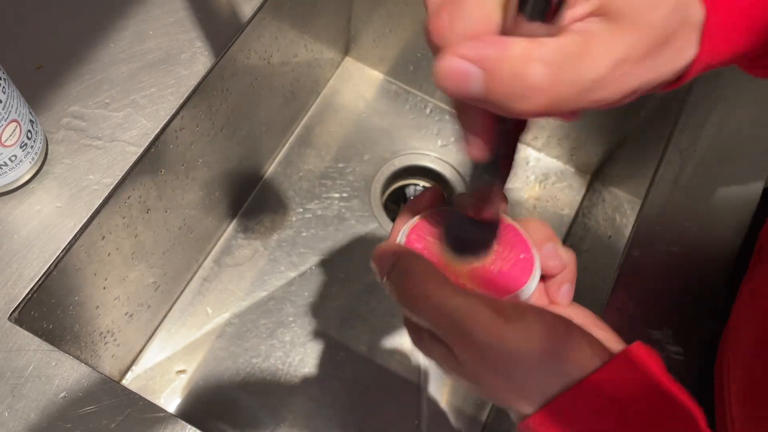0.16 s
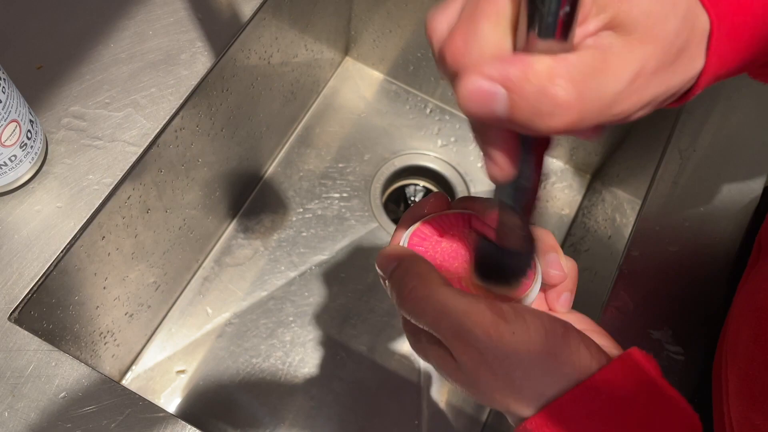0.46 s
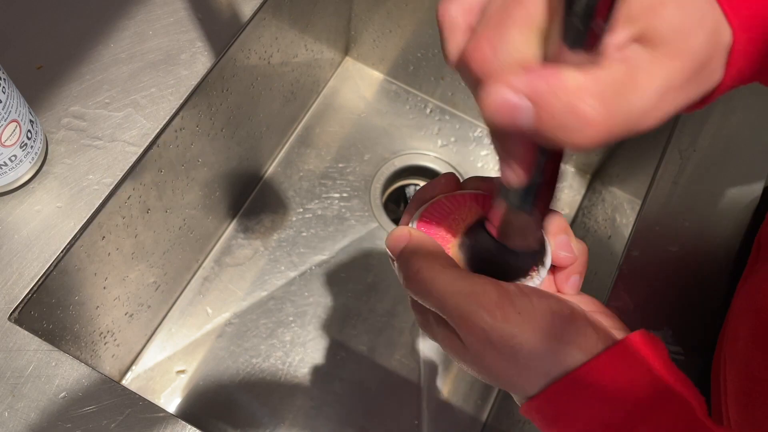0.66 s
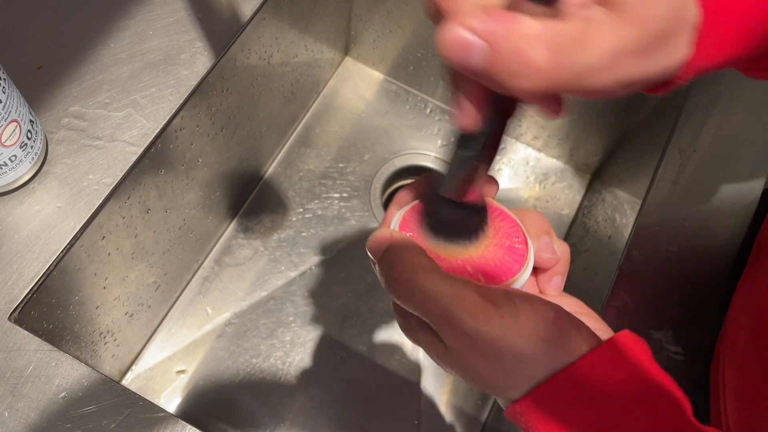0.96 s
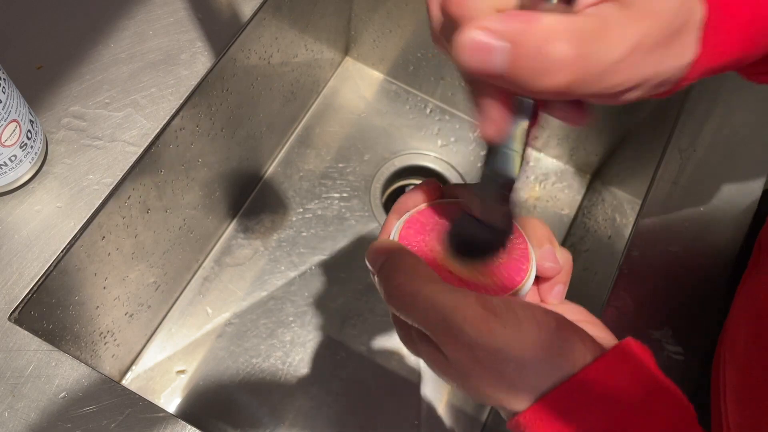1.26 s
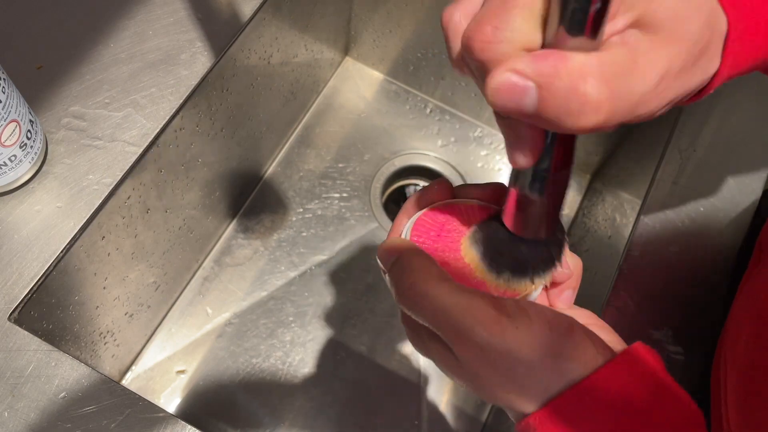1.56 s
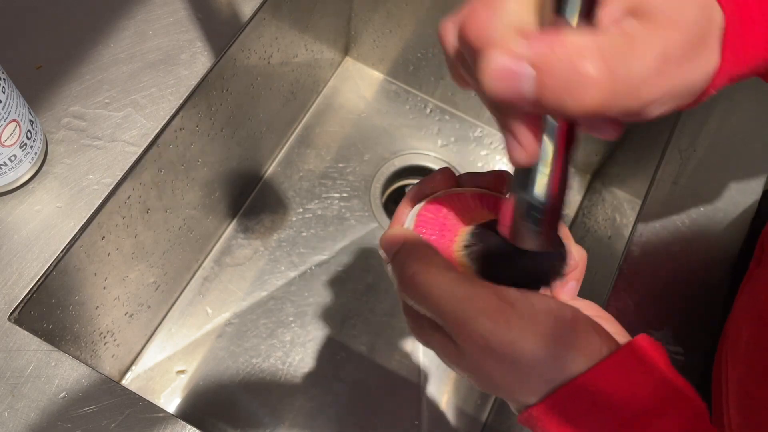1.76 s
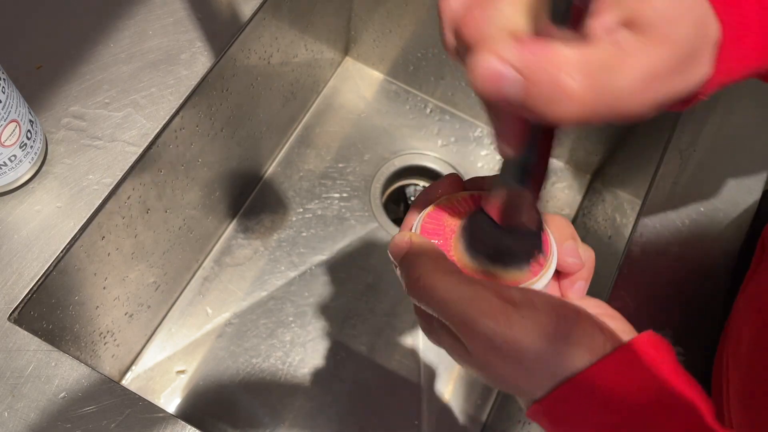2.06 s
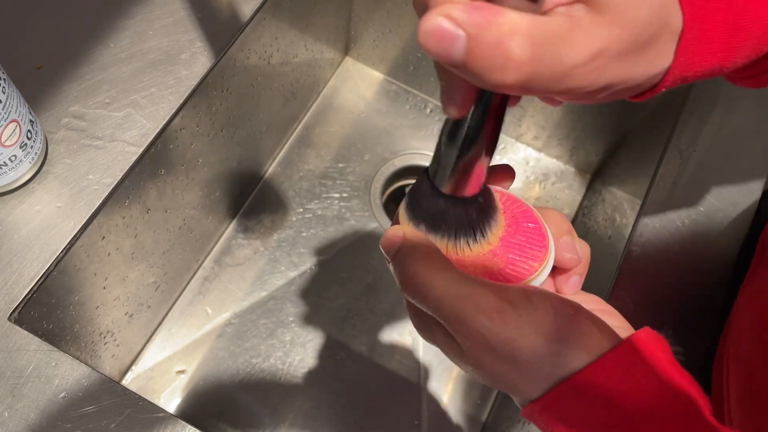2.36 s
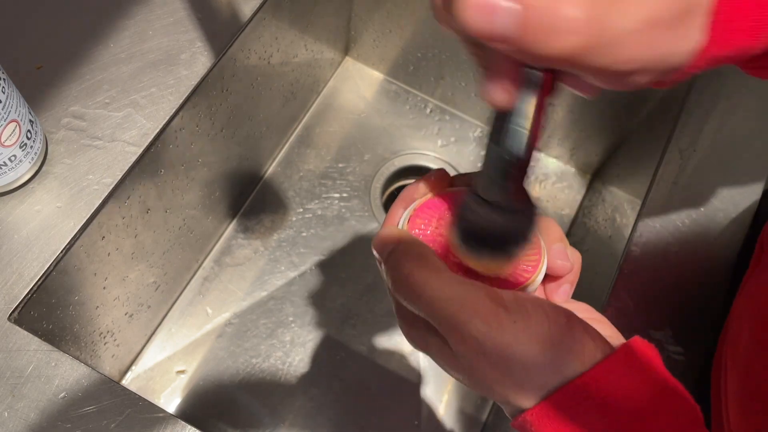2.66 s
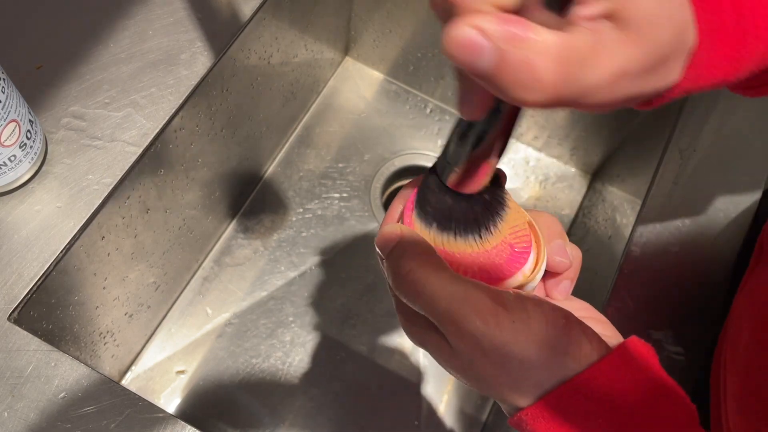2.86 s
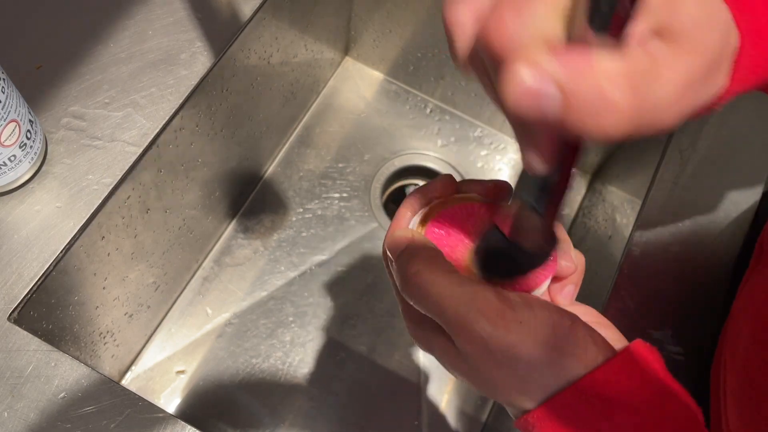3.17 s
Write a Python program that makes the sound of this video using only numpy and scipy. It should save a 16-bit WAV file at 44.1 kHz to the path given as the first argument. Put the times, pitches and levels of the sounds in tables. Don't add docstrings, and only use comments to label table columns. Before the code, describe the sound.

Quick raspy bristle strokes on a wet ridged pad, snapping and smacking, ending with hard clacks

```python
import sys
import numpy as np
from scipy import signal
from scipy.fft import rfft, irfft
from scipy.io import wavfile
from scipy.ndimage import uniform_filter1d

SR = 44100
rng = np.random.default_rng(int(sys.argv[2]) if len(sys.argv) > 2 else 0)


def inscribe(sig):
    pcm = np.round(np.clip(np.atleast_2d(sig).T, -1, 1) * 32767)
    wavfile.write(sys.argv[1], SR, pcm.astype(np.int16))


def linear_from_db(decibels):
    return 10 ** (np.asarray(decibels, float) / 20)


N = 145530

# [t/s, hold/s, speed level/dB, body level/dB]
STROKES = [(-.02, 0.027, -49.5, 1.5), (0.069, 0.035, -52, 5), (0.18, 0.029, -48, -5),
           (0.212, 0.045, -61, 10), (0.278, 0.031, -47, -6.5), (0.398, 0.027, -47, -1.5),
           (0.491, 0.036, -48, -0.5), (0.6, 0.014, -43, -3.5), (0.7, 0.038, -49.5, -0.5),
           (0.809, 0.04, -48, -2), (0.905, 0.032, -53, -3), (0.934, 0.018, -45, 4),
           (1.026, 0.045, -50.5, 2.5), (1.119, 0.058, -54.5, 2), (1.23, 0.038, -49.5, -1.5),
           (1.291, 0.0082, -54, 11.5), (1.356, 0.039, -48, 2), (1.474, 0.063, -52.5, 2.5),
           (1.584, 0.044, -52, -1), (1.69, 0.067, -52.5, 3.5), (1.808, 0.067, -51.5, 5.5),
           (1.94, 0.015, -43.5, -1), (2.052, 0.04, -50, 2.5), (2.156, 0.04, -48.5, 2),
           (2.277, 0.055, -50.5, 0), (2.384, 0.039, -51, 3.5),
           (2.442, 0.018, -53.5, 6.5),
    (2.485, 0.077, -51.5, 6.5),
    (2.595, 0.037, -54, 5.5),
    (2.734, 0.018, -50.5, 2.5),
    (2.78, 0.038, -49, -0.5),
    (2.875, 0.065, -54.5, 5),
    (2.996, 0.042, -54.5, 2.5),
    (3.117, 0.035, -47.5, 2.5),
    (3.218, 0.05, -51.5, 10),
    (3.266, 0.049, -61.5, 14.5),
]
# [f/Hz, level/dB]
BRISTLE_COLOUR = [(580, -24), (900, -14.5), (2400, -6), (3600, 2), (5200, -3), (8000, 2), (13500, -12.5),
                  (15500, -6.5)]
# [f/Hz, width/Hz, level/dB]
PAD_MODES = [(846, 470, 0.5), (1550, 350, 22), (2200, 150, -36.5), (3560, 85, -27), (5400, 800, 10)]
# [t/s, peak level/dB, ring f/Hz]
SNAPS = [(0.036, -38, 2000), (.071, -40, 1510), (.246, -33, 2900), (.174, -51, 3390), (.18, -27, 5140),
         (.287, -31.5, 2120), (0.396, -49, 5000), (0.404, -47, 3300), (.412, -49, 3000), (0.487, -34, 4800),
         (0.496, -38, 3420), (0.561, -45, 1500), (0.592, -41, 5460), (0.605, -41, 4950), (.62, -24, 4500),
         (0.677, -57, 5360), (.692, -44, 3820), (.7105, -29, 3060), (0.802, -34, 5150), (0.907, -51, 5200),
         (.914, -45, 3550), (.948, -34, 1570), (1.007, -30, 4150), (1.033, -43, 4990), (1.074, -42, 3500),
         (1.18, -44, 3000), (1.242, -41, 840), (1.3, -49, 1500), (1.343, -32, 3340), (1.463, -48, 5100),
         (1.48, -29.5, 4100), (1.529, -54, 5180), (1.549, -58, 764), (1.593, -36, 5040), (1.611, -55, 775),
         (1.713, -42, 1160), (1.744, -39.5, 1600), (1.756, -39, 1700), (1.776, -37, 1610),
         (1.817, -44, 4180), (1.878, -48, 740), (1.926, -31, 5160), (1.95, -35.5, 1240), (2.056, -46, 1620),
         (2.149, -36, 5310), (2.166, -38, 3520), (2.44, -52, 3610), (2.783, -49, 2480), (2.607, -32, 1240),
         (2.62, -46, 4500), (1.925, -44, 3000), (2.881, -34, 1810), (2.89, -38, 1700), (3.202, -39, 2400),
         (3.228, -22, 1550), (3.234, -22, 2290)]
# [t/s, peak level/dB, ring f/Hz, ring t60/s, tick level/dB]
SMACKS = [(0.038, -27.5, 1170, 0.0026, -44), (.202, -32.5, 5370, .004, 0), (.245, -30.5, 2190, 0.009, -18),
          (.33, -35.5, 4530, 0.0034, -1), (0.482, -34.5, 5200, 0.0091, -6),
          (0.521, -44.5, 1190, 0.021, -15), (0.601, -45, 1600, 0.02, 1), (.879, -23, 2540, 0.0013, -25),
          (.938, -32, 3240, 0.011, -15.5), (1.099, -41.5, 1020, 0.0087, -7), (1.241, -34, 3170, 0.011, -7),
          (1.373, -39.5, 1590, 0.072, 7.5), (1.944, -25.5, 5180, 0.0084, -2), (2.174, -29, 5100, 0.013, -5),
          (2.386, -37, 3060, 0.01, -16), (2.5073, -31, 1358, 0.031, -25), (2.5364, -27.5, 1870, 0.012, -29),
          (2.538, -35, 3190, 0.02, -20), (2.525, -39, 1920, 0.024, -32), (2.605, -36, 1500, 0.0073, -5),
          (2.695, -36.5, 1140, 0.027, -50), (2.785, -40.5, 510, 0.034, -20),
          (3.084, -35.5, 3060, 0.0033, -9)]
# [t/s, peak level/dB, ring f/Hz, tick level/dB, thump level/dB]
KNOCKS = [(1.957, -38.5, 1120, -40, -8.5), (2.191, -38, 970, -20, -14.5), (2.609, -30.5, 2200, -3, -19),
          (2.774, -22.5, 1760, -3.5, -33.5), (2.7846, -24, 2460, 4.5, -42), (2.887, -25, 1600, -25, -12),
          (2.888, -24, 1860, -13, -20.5), (2.894, -32.5, 2920, -26, -13.5), (3.04, -42.5, 1090, -15, -10),
          (3.096, -37, 1550, -11, -37), (3.101, -30.5, 1840, -31, -23.5), (3.207, -23.5, 2220, -31, -32),
          (3.2128, -21.5, 3090, -11, -19), (3.2167, -16, 1526, 1, -24.5)]
# [f/Hz, level/dB, t60/s]
CUP_MODES = [(1245, -19, 0.014), (1573, -15, 0.064), (1700, -12.5, 0.032), (2067, -18.5, 0.077),
             (2382, -16, 0.087), (3324, 2, 0.0077)]
# [f/Hz, phase/rad]
LEAD = [(300, 0), (600, -1.0), (2500, 1.0), (3200, .1), (4300, 1.0), (4950, -.5), (6500, 0)]
# [f/Hz, level/dB]
SHADE = [(1900, 0), (2700, 1.5), (3300, -2), (4500, -7), (5200, 0)]
# [f/Hz, likeness/0..1]
SAME = [(400, .99), (600, .88), (900, .96), (1800, .995), (2600, .82), (3500, .93), (4500, .72),
        (5500, .96), (7000, .96)]
# [t/s, level/dB]
DRONE_LEVEL = [(0.0, -45), (0.3, -49.5), (0.6, -47), (0.92, -48), (1.2, -56), (1.6, -52.5), (2.05, -51),
               (2.15, -44), (2.25, -49), (2.8, -47.5), (3.3, -47)]
# [f/Hz, width/Hz, level/dB]
DRONE_BANDS = [(30.7, 5.3, -17), (67, 14.5, -5.5), (111.7, 15, -11.5), (270, 36, -26)]
# [f/Hz, level/dB]
AIR_COLOUR = [(130, -17.5), (330, -29.5), (420, -32), (600, -41.5), (800, -29), (1100, -39), (2700, -47),
              (6000, -43)]
# [f/Hz, likeness/0..1]
AIR_SAME = [(100, .99), (600, .3), (1500, .9), (3500, .3)]

RISE_S, FALL_S, FALL_DB = 0.018, 0.018, -15
CREST_DB, CREST_AT = -3, 0.53
TAIL_DB, TAIL_DB_PER_S, REST_DB = -14.5, 140, -73
FLICKS_PER_S, FLICK_SPREAD_DB = 9000, 1.5
RIDGES_PER_S, RIDGE_DB = 530, 2.5
SMEAR = 0.79
BRISTLE_EDGE_HZ, PAD_DB, PATCHY_DB = 15950, -9.5, 2.1
SWELL_S, ROUGH = .0005, .35
TICK_S, TICK_HZ, TICK_GRIT, GRIT_FROM_HZ = .00045, 5200, .9, 1800
SNAP_CYCLES, SNAP_TICK_DB = 9, -8
GLIDE = 0.019
KNOCK_T60_S, CUP_DETUNE = .012, .04
THUMP_HZ, THUMP_T60_S, THUMP_ROUGH_DB = 272, 0.06, -3
THUMP_DROP, THUMP_DROP_S = 2, .002
SLIP_FROM_HZ, HALF_TURN_HZ, DWELL = 4450, 3300, .36
SINK_T60_S, SINK_EDGE_HZ = .035, 9000
HUM_HZ, HUM_DB = 58.2, -3
AIR_DB, AIR_PATCHY_DB, AIR_EDGE_HZ = -61, 2, 7000
EDGE_HZ = 15950
BLOCK_START = 709
JOINT_DB, JOINT_WOBBLE_DB, JOINT_LOUD_DB = 10, 7, 11


def brush():
    speed, body = stroke_power()
    drive = bristle_drive()
    hiss = evened(shaped(drive, lambda hz: linear_from_db(read(BRISTLE_COLOUR, hz)) * (hz < BRISTLE_EDGE_HZ)))
    pad = np.zeros(N)
    for k, (hz, width, db) in enumerate(PAD_MODES):
        mode = resonate(resonate(drive, hz, 2 * width), hz, 2 * width)
        pad += (-1) ** k * linear_from_db(db) * mode
    return patchy(np.sqrt(speed) * hiss + linear_from_db(PAD_DB) * np.sqrt(body) * evened(pad), PATCHY_DB)


def stroke_power():
    t = np.arange(N) / SR
    speed = np.full(N, linear_from_db(REST_DB) ** 2)
    body = speed.copy()
    for start, hold, db, body_db in STROKES:
        end = start + hold
        edge = np.maximum((start - t) / RISE_S, 0) + np.maximum((t - end) / FALL_S, 0)
        off_crest = np.abs(np.clip((t - start) / hold, 0, 1) - CREST_AT)
        arch = linear_from_db(db + FALL_DB * edge + CREST_DB * off_crest)
        tail = (t > start) * linear_from_db(db + TAIL_DB - TAIL_DB_PER_S * np.abs(t - end))
        power = arch ** 2 + tail ** 2
        speed += power
        body += power * linear_from_db(body_db) ** 2
    return speed, body


def bristle_drive():
    ridges = linear_from_db(RIDGE_DB * evened(resonate(rng.standard_normal(N), RIDGES_PER_S / 2, RIDGES_PER_S)))
    strength = linear_from_db(FLICK_SPREAD_DB * np.minimum(rng.exponential(1, N), 5))
    flicks = (rng.random(N) < FLICKS_PER_S / SR) * strength * rng.choice([-1., 1.], N)
    return evened(ridges * (evened(flicks) + SMEAR * rng.standard_normal(N)))


def patchy(x, depth_db):
    z = signal.stft(x, nperseg=256, noverlap=192)[2]
    field = uniform_filter1d(rng.standard_normal(z.shape), size=4, axis=0)
    field = evened(uniform_filter1d(field, size=10, axis=1))
    return signal.istft(z * linear_from_db(depth_db * field), nperseg=256, noverlap=192)[1][:N]


def snaps():
    t, out = np.arange(2000) / SR, np.zeros(N)
    for s, db, hz in SNAPS:
        t60 = SNAP_CYCLES / hz
        tick_gain = linear_from_db(SNAP_TICK_DB) * np.clip(hz / TICK_HZ, 0, 1) ** 2
        snap = ring(t, hz, t60) + ROUGH * scuff(t, hz, t60) + tick_gain * tick(t)
        add(out, s, linear_from_db(db) * snap)
    return out


def smacks():
    t, out = np.arange(2000) / SR, np.zeros(N)
    for s, db, hz, t60, tick_db in SMACKS:
        film = ring(t, hz * (1 + GLIDE * t / t60), t60)
        film = film + .5 * ring(t, 1.48 * hz, t60 / 2) + ROUGH * scuff(t, hz, t60)
        add(out, s, linear_from_db(db) * (film + linear_from_db(tick_db) * tick(t)))
    return out


def knocks():
    t, out = np.arange(5000) / SR, np.zeros(N)
    sag = t + THUMP_DROP * THUMP_DROP_S * (1 - np.exp(-t / THUMP_DROP_S))
    for s, db, hz, tick_db, thump_db in KNOCKS:
        knock = ring(t, hz, KNOCK_T60_S) + ROUGH * scuff(t, hz, KNOCK_T60_S)
        grip = 1 + CUP_DETUNE * rng.uniform(-0.75, 1, len(CUP_MODES))
        for (mode_hz, mode_db, t60), bend in zip(CUP_MODES, grip):
            far_db = 7.9 * abs(np.log2(mode_hz / hz))
            knock += linear_from_db(mode_db - far_db) * ring(t, mode_hz * bend, t60)
        thud = np.sin(2 * np.pi * THUMP_HZ * sag) * linear_from_db(-60 * t / THUMP_T60_S)
        thud = thud + linear_from_db(THUMP_ROUGH_DB) * scuff(t, 2 * THUMP_HZ, THUMP_T60_S)
        add(out, s, linear_from_db(db) * (knock + linear_from_db(tick_db) * tick(t) + linear_from_db(thump_db) * thud))
    return out


def ring(t, hz, t60):
    return np.sin(2 * np.pi * hz * t) * linear_from_db(-60 * t / t60) * (1 - np.exp(-t / SWELL_S))


def scuff(t, hz, t60):
    band = resonate(resonate(rng.standard_normal(len(t)), hz, hz / 2), hz, hz)
    return evened(band) * linear_from_db(-60 * t / t60) * (1 - np.exp(-t / SWELL_S))


def tick(t):
    grit = uniform_filter1d(rng.standard_normal(len(t)), size=3)
    crack = (np.cos(2 * np.pi * TICK_HZ * t) + TICK_GRIT * grit) * np.exp(-t / TICK_S)
    return signal.lfilter(*signal.butter(1, GRIT_FROM_HZ, "high", fs=SR), crack)


def ports(x):
    side = np.array([[1], [-1]])

    def lead(hz):
        slip = np.pi * np.maximum(hz - SLIP_FROM_HZ, 0) / HALF_TURN_HZ
        return read(LEAD, hz) + slip - DWELL * np.sin(2 * slip)

    def direct_gain(hz):
        shade = linear_from_db(side * read(SHADE, hz) / 2)
        return np.sqrt(read(SAME, hz)) * shade * np.exp(.5j * side * lead(hz))

    return shaped(x, direct_gain) + shaped(sink(x), lambda hz: np.sqrt(1 - read(SAME, hz)))


def sink(x):
    taps = np.zeros((2, 8000))
    at = np.arange(60, 7980, 20) + rng.integers(0, 20, (2, 396))
    np.put_along_axis(taps, at, rng.choice([-1., 1.], at.shape), 1)
    taps = taps * linear_from_db(-60 * np.arange(8000) / SR / SINK_T60_S)
    taps = signal.lfilter(*signal.butter(1, SINK_EDGE_HZ, fs=SR), taps)
    return signal.fftconvolve(x[None], taps / np.linalg.norm(taps[0]), axes=1)[:, :N]


def kitchen():
    t = np.arange(N) / SR
    rumble = rng.standard_normal(N)
    drone = linear_from_db(HUM_DB) * np.sqrt(2) * np.sin(2 * np.pi * HUM_HZ * t)
    for hz, width, db in DRONE_BANDS:
        drone += linear_from_db(db) * evened(resonate(resonate(rumble, hz, width), hz, width))
    return linear_from_db(np.interp(t, *np.transpose(DRONE_LEVEL))) * drone + room_air()


def room_air():
    def same(hz):
        return np.clip(read(AIR_SAME, hz), 0, 1)

    def colour(hz):
        return linear_from_db(read(AIR_COLOUR, hz)) / (1 + (hz / AIR_EDGE_HZ) ** 4)

    left = shaped(rng.standard_normal(N), colour)
    own = shaped(rng.standard_normal(N), lambda hz: colour(hz) * np.sqrt(1 - same(hz) ** 2))
    right = shaped(left, same) + own
    drift = linear_from_db(AIR_PATCHY_DB * evened(resonate(rng.standard_normal(N), 2, 6)))
    return linear_from_db(AIR_DB) * drift * evened(np.array([left, right]))


def evened(x):
    return x / np.sqrt(np.mean(x ** 2) + 1e-20)


def read(points, hz):
    f, value = np.transpose(points)
    return np.interp(np.log(hz + 1), np.log(f + 1), value)


def shaped(x, gain):
    return irfft(rfft(x) * gain(np.fft.rfftfreq(x.shape[-1], 1 / SR)), x.shape[-1])


def resonate(x, hz, width):
    r = np.exp(-np.pi * width / SR)
    return 2 * signal.lfilter([1 - r], [1, -r * np.exp(2j * np.pi * hz / SR)], x).real


def add(mix, s, sound):
    part = mix[round(s * SR):][:len(sound)]
    part += sound[:len(part)]


def scene():
    return ports(brush() + snaps() + smacks() + knocks()) + kitchen()


def joint(x):
    lead_in = 1024 - BLOCK_START
    pair = np.pad(np.array([x[0] + x[1], x[0] - x[1]]) / 2, ((0, 0), (lead_in, 0)))
    window = signal.windows.kaiser_bessel_derived(2048, 4 * np.pi)
    z = signal.stft(pair, window=window, nperseg=2048, noverlap=1024)[2]
    band = np.minimum(np.arange(1025) // 32, 31)
    power = np.add.reduceat(abs(z) ** 2, np.arange(0, 1024, 32), axis=1) + 1e-20
    wobble = JOINT_WOBBLE_DB * rng.standard_normal(power.shape[::2])[:, None]
    near = 10 * np.log10(power[::-1] / power) + wobble < JOINT_DB
    outer = abs(np.arange(32)[:, None] - 12.5) > 11
    loud = power[:, 2:].sum((0, 1))
    knocked = loud > linear_from_db(2 * JOINT_LOUD_DB) * np.median(loud)
    keep = near | outer | knocked
    y = signal.istft(z * keep[:, band], window=window, nperseg=2048, noverlap=1024)[1]
    m, s = y[:, lead_in:][:, :N]
    return np.array([m + s, m - s])


def top_cut(x):
    return signal.sosfilt(signal.butter(12, 16650, fs=SR, output="sos"), x)


def record(dry):
    low_pass = signal.firwin(511, EDGE_HZ, window=("kaiser", 9), fs=SR)
    mix = joint(signal.oaconvolve(dry, low_pass[None], "same"))
    return top_cut(mix)


dry = scene()
out = record(dry)
inscribe(out)
```